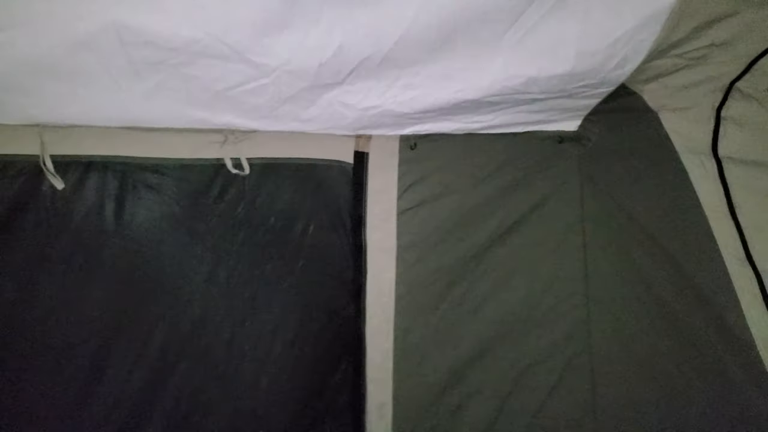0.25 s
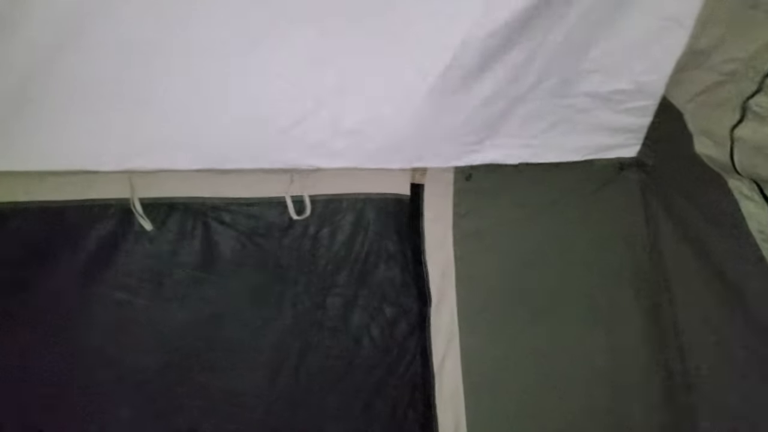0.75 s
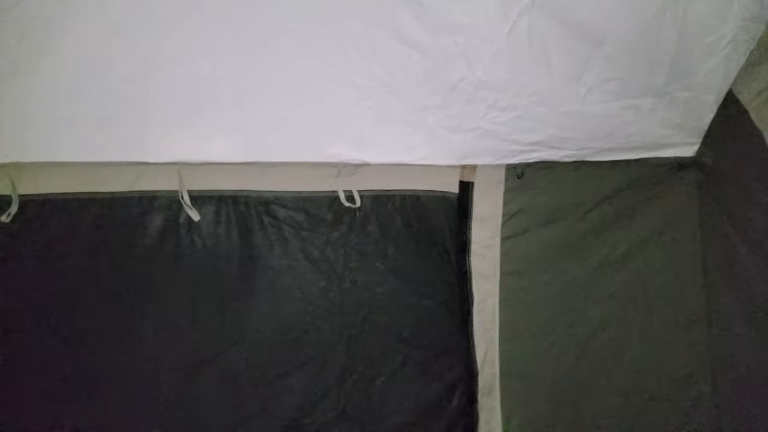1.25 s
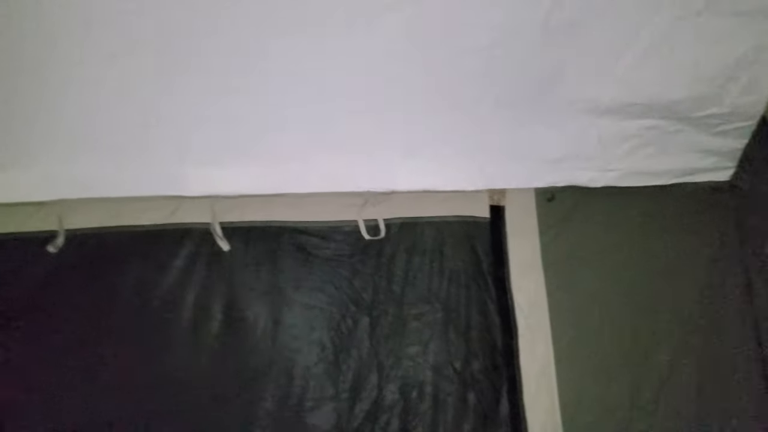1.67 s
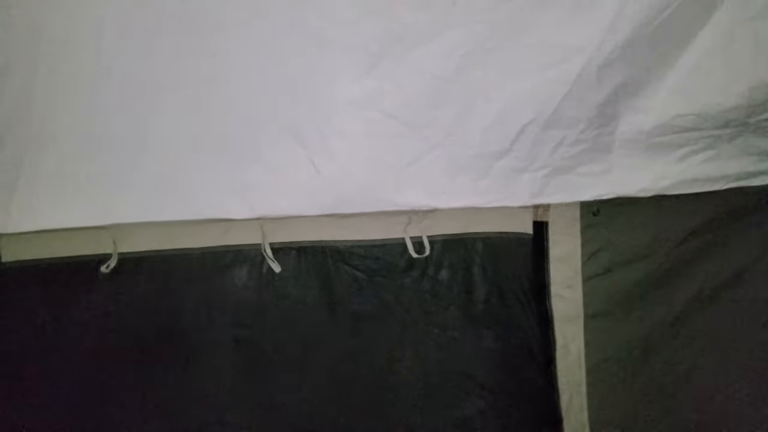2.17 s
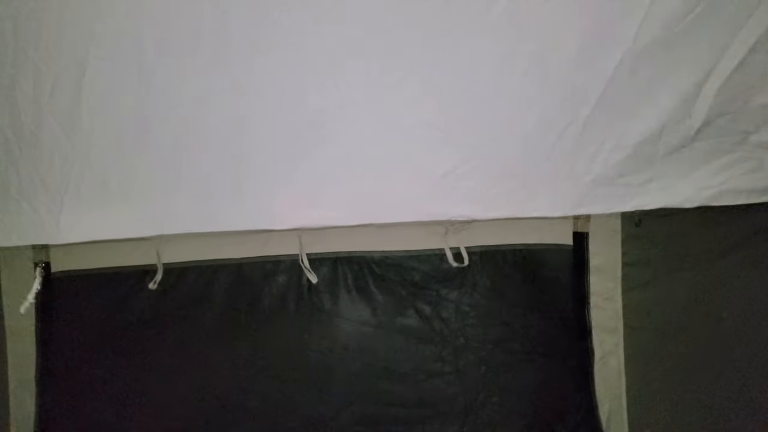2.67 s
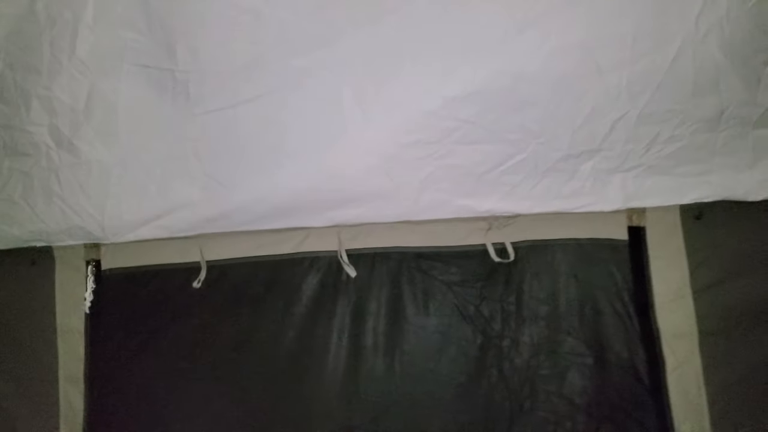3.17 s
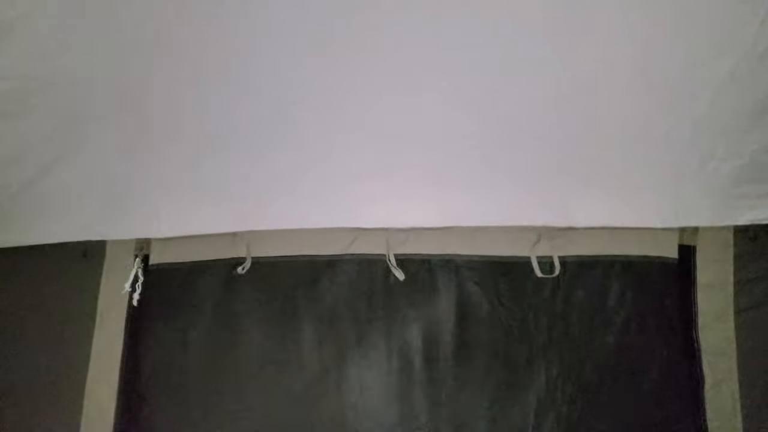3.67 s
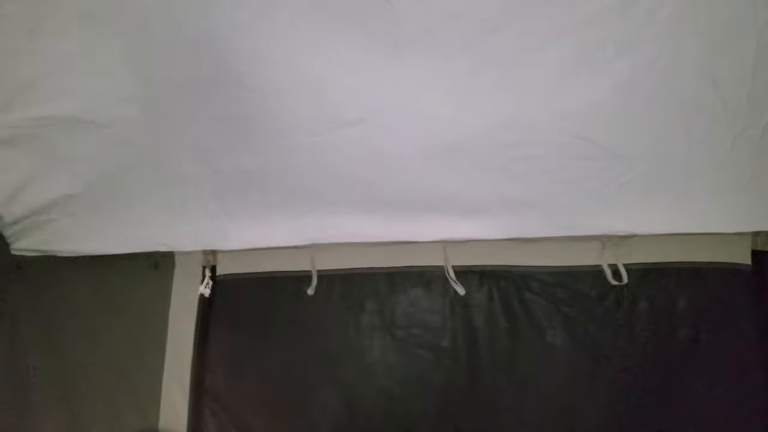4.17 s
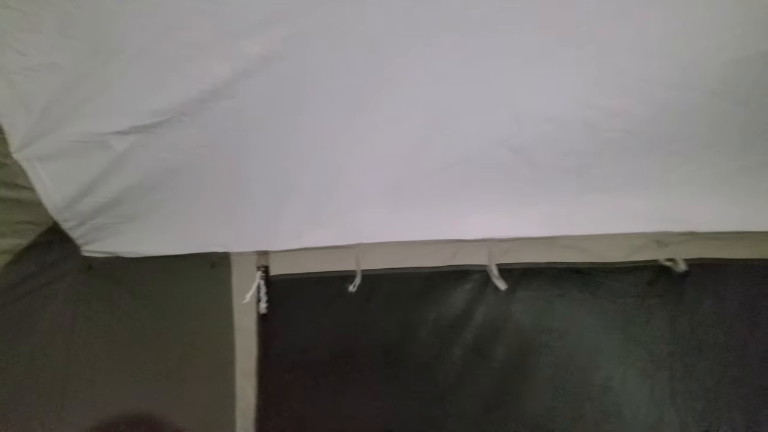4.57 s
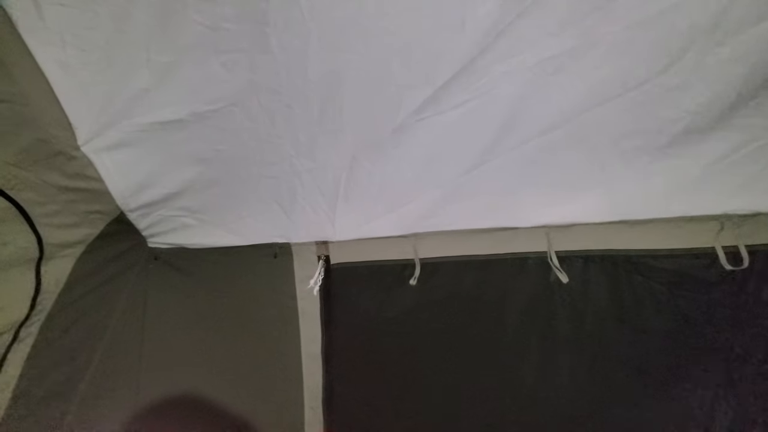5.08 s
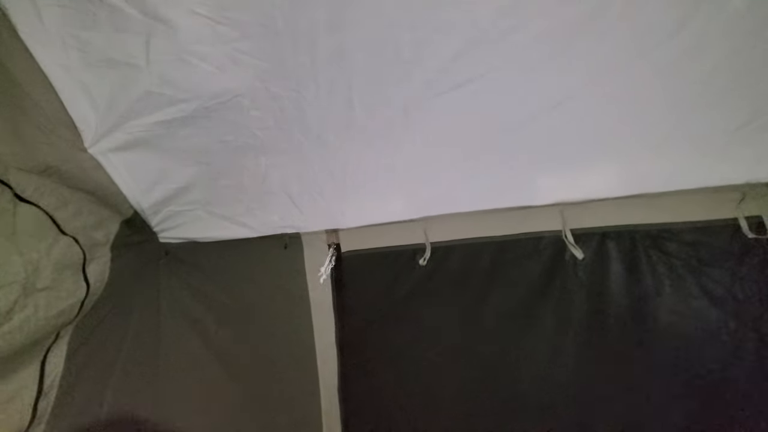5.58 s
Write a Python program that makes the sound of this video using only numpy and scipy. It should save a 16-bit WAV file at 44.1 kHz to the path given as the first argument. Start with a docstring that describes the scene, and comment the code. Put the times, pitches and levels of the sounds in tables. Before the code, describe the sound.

Close, wide stereo from a hand-held phone in a small dry tent. Muffled wind rushes steadily outside while the walls rumble and flap unevenly. Creases crack and panels thump early; something brushes and knocks the left microphone; later a strong gust yanks the cloth taut with a loud snap and a short knock of the frame. Bright, thin metal clinks scatter over everything, and the end is calmer.

```python
"""Tent walls in gusty wind, recorded inside the tent on a hand-held phone with two microphones.
The walls rumble and flutter: shaped noise that follows the wind. The cloth also rustles, swishes and scuffs.
Panels snap taut with a thump (a swung pulse) and creases crack (short ragged noise).
Zip pulls jingle as ringing modes, and jolts of the frame knock. The wind outside is an even rush.
Once something brushes over the left microphone (bursts of tiny slips) and bumps it (a swung pulse)."""
import sys
import numpy as np
from scipy import signal
from scipy.fft import rfft, irfft
from scipy.io import wavfile
from scipy.ndimage import uniform_filter1d

SR = 44100
rng = np.random.default_rng(int(sys.argv[2]) if len(sys.argv) > 2 else 0)


def dump_mix(stems):
    """Bounce the given channels to the path in sys.argv[1] as a 16-bit WAV at rate SR."""
    frames = np.atleast_2d(stems).T  # one column per channel
    limited = np.clip(frames, -1, 1)  # hard clip at full scale
    pcm = np.round(limited * 32767).astype(np.int16)
    wavfile.write(sys.argv[1], SR, pcm)


N = 257103
TIME = np.arange(N) / SR


def gain_of(db):
    """Decibels to amplitude."""
    return 10 ** (np.asarray(db) / 20)


def evened(x):
    """Scales to an rms of one."""
    return x / np.sqrt(np.mean(x ** 2) + 1e-20)


def read(points, hz):
    """Reads a spectrum on a log-frequency axis."""
    f, value = np.transpose(points)
    return np.interp(np.log(hz + 1), np.log(f + 1), value)


def curve(rows, axis=1):
    """One column of a curve at every sample."""
    rows = np.asarray(rows)
    return np.interp(TIME, rows[:, 0], rows[:, axis])


def pan(db):
    """Left and right gains of constant power for a left-minus-right level difference."""
    return evened(gain_of(np.array([[db], [-db]]) / 2))


def add(mix, s, sound):
    """Mixes a sound in at time s."""
    start = max(round(s * SR), 0)
    part = mix[:, start:][:, :sound.shape[-1]]
    part += sound[..., :part.shape[1]]


def decay(t, t60):
    """Exponential fall of 60 dB in t60 seconds."""
    return np.exp(-np.log(1000) * t / t60)


def arch(size):
    """An envelope that swells quickly and fades slightly more slowly."""
    return np.sin(np.pi * np.linspace(0, 1, size) ** 0.89)


def wander(shape, hz):
    """Smooth complex chance of rms one that changes up to about hz times a second."""
    z = rng.standard_normal(shape) + 1j * rng.standard_normal(shape)
    smoothing = 1 + (np.fft.fftfreq(shape[-1], 1 / SR) / hz) ** 2
    z = np.fft.ifft(np.fft.fft(z) / smoothing)
    return z / np.sqrt(np.mean(abs(z) ** 2))


# Left-right likeness inside the tent: f/Hz, correlation of the two microphones (-1 to 1)
LIKENESS = [(30, 1), (130, .92), (260, 0.85), (500, 0.33), (1000, -.15), (2000, 0), (5000, 0), (16000, 0)]


def colour(pair, spectrum, tilt_db=0):
    """Gives two unrelated signals a spectrum, the tent's left-right likeness and an rms of one."""
    size = pair.shape[1]
    hz = np.fft.rfftfreq(size, 1 / SR)
    same = np.clip(read(LIKENESS, hz), -1, 1)
    mid, side = rfft(pair) * np.sqrt([1 + same, 1 - same])
    tilt = tilt_db * np.log2(np.maximum(hz, 100) / 1000)  # dB per octave about 1 kHz
    shape = gain_of(read(spectrum, hz) + tilt)
    return evened(irfft(np.array([mid + side, mid - side]) * shape, size))


def grains(per_s, spread_db, t60, smooth):
    """Random little bursts of uneven size over a share of smooth noise."""
    struck = rng.random(N) < per_s / SR
    size = gain_of(spread_db * np.minimum(rng.exponential(1, N), 4)) * struck
    keep = gain_of(-120 / (t60 * SR))  # power falls by 60 dB in t60
    power = abs(signal.lfilter([1], [1, -keep], size ** 2))
    return np.sqrt(power / power.mean() + abs(smooth)) * rng.standard_normal((2, N))


# Wind outside, through the canvas: f/Hz, relative level/dB per Hz
RUSH_SPECTRUM = [(120, 5.5), (250, -0.5), (420, 6), (620, 2.5), (740, -7), (940, -16), (1200, -6.5),
                 (1650, -12), (2300, -16.5), (3300, -21), (6000, -24), (16000, -42)]


def rush(db=-56):
    """The even roar of the wind outside, dulled by the canvas."""
    return gain_of(db) * colour(rng.standard_normal((2, N)), RUSH_SPECTRUM) * pan(-0.011)


# Ringing parts of the frame, likely the poles: f/Hz, relative level/dB, t60/s
POLE_MODES = [(466, 5.5, 0.054), (736, 0.5, 0.053), (1203, -6, 0.059), (1654, -10, 0.07), (2200, -7, 0.078),
              (2690, -15, .06), (2860, -26, 0.054)]
# Jolts of the frame: t/s, level/dB
FRAME_JOLTS = [(.1435, -45), (3.4434, -29.5)]


def poles():
    """Hard snaps jolt the frame, whose decaying modes give a short, dry knock."""
    out, t = np.zeros((2, N)), TIME[:SR // 8]
    hz, mode_db, t60 = np.transpose(POLE_MODES)[:, :, None]
    modes = gain_of(mode_db) * decay(t, t60) * np.sin(2 * np.pi * hz * t)
    knock = modes.sum(0)
    for s, db in FRAME_JOLTS:
        add(out, s, gain_of(db) * pan(0) * knock)
    return out


# Cloth sliding on cloth; a narrow band is a squeak:
# t/s, length/s, centre f/Hz, half-width/octaves, level/dB (rms before the swell and fade)
CLOTH_SLIDES = [(0.139, 0.01, 2860, 0.11, -35.5), (0.428, 0.13, 1350, 0.83, -50),
                (1.037, 0.049, 5720, 0.062, -60), (2.035, .05, 390, 0.38, -44.5),
                (2.967, 0.054, 2590, 0.7, -54), (3.014, 0.063, 1900, 1.2, -51.5),
                (3.208, 0.055, 373, 0.22, -39), (3.227, 0.076, 1680, 0.87, -47.5),
                (3.335, 0.022, 2290, 0.14, -41), (3.451, 0.025, 2300, 0.12, -41.5),
                (3.919, 0.027, 600, 1.8, -49), (3.983, 0.061, 1710, 0.21, -46.5),
                (4.004, 0.1, 3470, 2.9, -47), (4.092, 0.058, 13000, 0.56, -43),
                (4.489, 0.049, 1460, 0.5, -49.5), (4.559, 0.058, 4900, 0.75, -52.5)]


def scuffs():
    """One layer drags over another: a quick swell of tiny slips that then fades."""
    out = np.zeros((2, N))
    slips = grains(per_s=450, spread_db=3, t60=.008, smooth=.5)
    for s, length, hz, octaves, db in CLOTH_SLIDES:
        size = int(length * SR)
        excerpt = slips[:, round(s * SR):][:, :size]
        offset = np.log2((np.fft.rfftfreq(size, 1 / SR) + 1) / hz) / octaves
        slide = evened(irfft(rfft(excerpt) / (1 + offset ** 2), size))
        add(out, s, gain_of(db) * slide * arch(size))
    return out * pan(-0.71)


# High swish of the weave, which the faint clinks also follow: t/s, level/dB
SWISH_LEVEL = [(0, -53.5), (.2, -49.5), (.85, -62), (1.08, -59), (1.42, -61.5), (2.4, -67.5), (2.94, -66),
               (3.13, -49), (3.53, -59.5), (3.9, -53), (4.08, -46.5), (4.18, -55), (4.78, -53),
               (5.13, -62.5), (5.83, -59.5)]
# Faint clinks: rate per second, mean level over the swish, greatest swing of level and of side (dB)
JINGLE_PER_S, JINGLE_DB, JINGLE_SPREAD_DB, JINGLE_SIDE_DB = 4.5, 1, 8.5, 7


def jingles():
    """Rows of faint clinks: the two loosest pulls swing at random, harder when the cloth swishes more."""
    count = int(JINGLE_PER_S * N / SR)
    when, strength, side, pull = rng.random((count, 4)).T
    s = (np.arange(count) + when) / JINGLE_PER_S
    swish_db = np.interp(s, *np.transpose(SWISH_LEVEL))
    db = swish_db + JINGLE_DB + JINGLE_SPREAD_DB * (2 * strength - 1)
    which = np.where(pull < .3, "rich", "light")
    return list(zip(s, db, JINGLE_SIDE_DB * (2 * side - 1), which))


# Clear clinks of the zip pulls: t/s, level/dB (before the lift all clinks share), left minus right/dB, pull
CLEAR_CLINKS = [(.012, -45, -1, "rich"), (.033, -38, 5, "rich"), (.084, -46, -2, "rich"),
                (.1715, -40.5, 2, "light"), (.242, -42, 2, "light"), (.585, -48.5, 3, "light"),
                (1.076, -52, 22, "light"), (1.215, -51, 5, "light"), (2.087, -55, -7, "pure"),
                (2.4364, -45.5, 6, "rich"), (2.454, -47, 2, "light"), (3.123, -42, 11, "light"),
                (3.149, -32.5, 2.5, "bell"), (3.225, -52, 12, "bell"), (3.931, -45, 1, "light"),
                (3.995, -43.5, -8, "light"), (4.2, -41, -2, "thin"), (4.298, -44.5, 1, "light"),
                (4.476, -47.5, 2, "rich"), (4.8474, -44, -3, "rich"), (5.033, -47, 1, "rich"),
                (5.3186, -50.5, 0, "rich")]
# Modes of the five pulls, by name: f/Hz, relative level/dB, t60/s (pitch and level vary by blow)
PULL_MODES = {"rich": [(3890, -10.5, 0.1), (5750, -16, 0.093), (6360, -6, 0.083), (7650, -34, 0.044),
              (9280, -7, 0.12), (11600, -5, 0.068), (11300, -16, 0.07), (11610, -2.5, 0.1),
              (13180, -0.5, 0.087), (15200, -0.5, 0.062)], "bell": [(4100, -7, .06), (5120, -2, 0.22),
              (5400, -2, 0.067), (9450, -15, 0.08), (12080, 7.5, 0.074), (12310, -1, .08),
              (13400, -11, 0.059), (14230, 0, 0.11)], "pure": [(11350, 4, 0.14), (11650, -14, .08)],
              "light": [(7760, -10, 0.1), (11600, -10, 0.052), (12160, 5.5, 0.083), (12800, -16, 0.085),
              (13000, -19, .05), (14400, 4.5, 0.047)], "thin": [(11600, -11, 0.079), (11770, -1, 0.14)]}


def zips(uneven_db=3, detune=0.002, blur_hz=45, pure=0.8, tick_db=-3.5, tick_t60=0.085, rise=0.003, lift_db=3.5):
    """Small metal pulls chatter as they strike, which blurs their modes; each blow favours other modes."""
    out, t = np.zeros((2, N)), TIME[:SR // 5]
    for s, db, side_db, which in list(CLEAR_CLINKS) + jingles():
        hz, mode_db, t60 = np.transpose(PULL_MODES[which])[:, :, None]
        hz = hz * (1 + detune * rng.standard_normal(hz.shape))
        size = gain_of(mode_db + uneven_db * rng.standard_normal(hz.shape))
        steady = pure * np.exp(2j * np.pi * rng.random((2, len(hz), 1)))
        blur = wander((2, len(hz), len(t)), blur_hz)
        chatter = evened(((steady + blur) * np.exp(2j * np.pi * hz * t)).real)
        ring = (size * decay(t, t60) * chatter).sum(1) / np.linalg.norm(size)
        tick = colour(rng.standard_normal((2, len(t))), SWISH_SPECTRUM) * decay(t, tick_t60)
        clink = (ring + gain_of(tick_db) * tick) * (1 - np.exp(-t / rise))
        add(out, s, gain_of(db + lift_db) * pan(side_db) * clink)
    return out


# Something dragging on the left microphone: f/Hz, relative level/dB per Hz (before each rub's tilt)
BRUSH_SPECTRUM = [(150, 4), (500, 7.5), (1400, 6.5), (3000, 1.5), (4500, -6), (6300, 1), (8000, -5.5),
                  (11000, -11.5), (16000, -17)]
# Its rubs: t/s, length/s, level/dB (rms before the envelope), brightness/dB per octave
MICROPHONE_RUBS = [(1.43, 0.38, -50, 2), (1.611, 0.13, -41, 0), (1.681, 0.011, -30.5, -2.5),
                   (1.691, 0.019, -29.5, -10), (1.737, 0.15, -44, 18)]


def brush():
    """Something drags right over the left port, catches, and thins to a fine hiss as it lets go."""
    out = np.zeros((2, N))
    slips = grains(per_s=900, spread_db=2.5, t60=.008, smooth=1.5)
    for s, length, db, tilt_db in MICROPHONE_RUBS:
        size = int(length * SR)
        excerpt = slips[:, round(s * SR):][:, :size]
        rub = colour(excerpt, BRUSH_SPECTRUM, tilt_db)
        add(out, s, gain_of(db) * rub * np.sin(np.linspace(0, np.pi, size)))
    return out * gain_of([[0], [-30]])  # left, right


# Creases at the walls: f/Hz, relative level/dB per Hz (before each crack's tilt)
CRACK_SPECTRUM = [(120, -18), (300, 9), (450, 5.5), (640, 0.5), (900, -1), (1250, 2), (1600, 0.5),
                  (2000, -1), (2400, -6), (2900, -7), (3700, -15), (6000, -21.5), (10000, -35.5),
                  (16000, -26.5)]
# Creases cracking: t/s, level/dB (before the envelope), rise/s, decay t60/s, brightness/dB per octave
CREASE_CRACKS = [(0.1427, -23.5, 0.00061, 0.032, -1.5), (0.1504, -29.5, 0.00039, 0.11, 1),
                 (.294, -38.5, .003, 0.039, 3), (.354, -34, 0.0017, 0.051, 9.5),
                 (.497, -36.5, 0.0035, 0.13, -2), (1.981, -40.5, 0.00044, 0.097, 1),
                 (3.202, -38.5, 0.0024, 0.12, 1.5), (3.221, -30, 0.0026, 0.11, 7),
                 (3.278, -34, .003, 0.089, 1.5), (3.289, -36.5, 0.00085, 0.11, 4),
                 (3.4432, -21, 0.0011, 0.033, 0.4), (3.451, -33.5, 0.0013, 0.092, 5.5),
                 (4.023, -35, .002, 0.044, 0.5), (4.047, -36, .002, 0.074, 1.5),
                 (4.080, -35.5, 0.0023, 0.14, 1.5), (4.094, -29, 0.0023, 0.061, -2),
                 (4.571, -39.5, 0.0007, 0.11, -4.5), (4.988, -50, 0.00057, 0.057, 0.5),
                 (5.598, -43, 0.0017, 0.077, 9.5), (5.774, -42.5, 0.0006, 0.25, -3)]


def cracks(edge=0.93, edge_t60=0.0066, ragged_db=4):
    """Creases pull straight: a sharp edge, then a short ragged scatter between the walls."""
    out, t = np.zeros((2, N)), TIME[:SR // 5]
    for s, db, rise, t60, tilt_db in CREASE_CRACKS:
        fall = decay(t, t60) + edge * decay(t, edge_t60)
        ragged = gain_of(ragged_db * wander(t.shape, hz=496).real)
        crackle = rng.standard_normal((2, len(t))) * ragged
        add(out, s, gain_of(db) * colour(crackle, CRACK_SPECTRUM, tilt_db) * fall * (1 - np.exp(-t / rise)))
    return out * pan(-.7)


# Panels pulled taut, and at 1.7142 s a bump on the left microphone: t/s, peak level/dB (of the swing,
# before panning), time scale of the jerk/s, swing f/Hz, left minus right/dB
THUMP_EVENTS = [(.109, -31.5, 0.00033, 220, -1), (0.146, -27.5, 0.001, 65, 1),
                (0.171, -26.5, 0.0014, 85.5, 1), (.291, -31, 0.0006, 110, 2),
                (0.481, -27.5, 0.0011, 81.5, 2), (0.9798, -28.5, 0.00063, 60, 2.5),
                (1.105, -34.5, 0.00036, 60, 1), (1.516, -31, 0.00067, 189, 2),
                (1.7142, -14, 0.00068, 49, 34), (2.041, -25, 0.0036, 80, 0), (2.0543, -30, 0.00087, 89, -1),
                (2.116, -33, 0.00094, 130, 0), (2.577, -33.5, 0.00095, 213, 2),
                (3.227, -25.5, 0.00039, 109, 3), (3.4436, -14.5, 0.0015, 59.3, 1),
                (4.093, -23, 0.00096, 61.7, 0.5), (4.2079, -26.5, 0.0023, 109, 1.5),
                (4.2167, -28.5, 0.0022, 127, 1)]


def thumps(damping=0.61, whip_s=0.00027, whip_db=-2):
    """A panel stops dead or the left microphone is bumped: a pulse swings; hard ones add a whip of pressure."""
    lead = .003  # seconds of room for the whip before the pulse
    out, t = np.zeros((2, N)), TIME[:SR // 8] - lead
    for s, db, jerk, hz, side_db in THUMP_EVENTS:
        u = np.maximum(t, 0) / jerk
        suction = -u ** 2 * np.exp(-u)
        w = 2 * np.pi * hz
        resonance = signal.bilinear([1, 0, 0], [1, damping * w, w * w], SR)
        swing = signal.lfilter(*resonance, suction)
        hardness = np.clip((db + 20) / 8, 0, 1)  # none at or below -20 dB
        whip = hardness * gain_of(whip_db) * np.exp(-abs(t) / whip_s)
        add(out, s - lead, gain_of(db) * pan(side_db) * (swing / abs(swing).max() + whip))
    return out


# Short gusts on top of the wind: t/s, length/s, lift of the rumble/dB,
# lift of the cloth's motion/dB (the flutter takes only a share)
SHORT_GUSTS = [(0.196, 0.14, -2.5, 7), (.32, 0.057, 4, 3.5), (0.63, .08, 3.5, -1), (2.047, 0.12, 7.5, 0.5),
               (3.028, 0.075, 0, 9), (3.26, 0.13, 8, 9.5), (3.418, 0.051, 11.5, 6),
               (3.712, 0.074, 4.5, 2.5), (3.913, 0.091, 4, 0.5), (4.095, 0.066, 6, 17), (5.273, 0.22, 5, 2),
               (5.524, 0.11, 2, -3.5)]


def gust_lift(axis):
    """Decibels that the gusts add: each is a bell in time."""
    return sum(row[axis] * np.exp(-(2 * (TIME - row[0]) / row[1]) ** 2) for row in SHORT_GUSTS)


# Cloth in the tent, three layers: f/Hz, relative level/dB per Hz
FLUTTER_SPECTRUM = [(70, -27), (140, 1), (220, 2.5), (310, -2), (430, -3.5), (620, -12.5), (760, -8.5),
                    (950, -18), (1250, -15.5), (2200, -40), (5000, -73)]
RUSTLE_SPECTRUM = [(250, -17), (600, 7.5), (950, 0.5), (1300, -1.5), (1700, 3), (2600, -5.5), (3500, -12),
                   (6000, -20), (9000, -30), (16000, -26)]
SWISH_SPECTRUM = [(1200, -2), (3500, -1), (6000, -0.5), (8200, 2), (9000, -3.5), (10500, -0.5),
                  (12200, 7.5), (13400, 1), (16000, 2.5)]
# levels in a moderate blow (dB), and how each follows the wind (dB per dB)
FLUTTER_DB, RUSTLE_DB = -52, -60.5
FLUTTER_FOLLOWS, RUSTLE_FOLLOWS = 0.84, 0.73


def cloth(flutter_lift=0.53):
    """Slack cloth flutters in small flaps, its folds rustle, and the weave swishes over itself."""
    wind, lift = curve(WIND_STRENGTH), gust_lift(axis=3)
    flaps = grains(per_s=110, spread_db=2.5, t60=.06, smooth=1.2)
    folds = grains(per_s=200, spread_db=2.5, t60=0.13, smooth=0.49)
    weave = grains(per_s=83, spread_db=6.5, t60=0.27, smooth=0.96)
    flutter_db = FLUTTER_DB + FLUTTER_FOLLOWS * wind + flutter_lift * lift
    rustle_db = RUSTLE_DB + RUSTLE_FOLLOWS * wind + lift
    flutter = colour(flaps, FLUTTER_SPECTRUM) * gain_of(flutter_db)
    rustle = colour(folds, RUSTLE_SPECTRUM) * gain_of(rustle_db)
    swish = colour(weave, SWISH_SPECTRUM) * gain_of(curve(SWISH_LEVEL))
    return flutter * pan(0) + rustle * pan(-4.5) + swish * pan(1.5)


# Big panels around the microphones: f/Hz, relative level/dB per Hz
RUMBLE_SPECTRUM = [(15, -28.5), (30, -4.5), (50, -2.5), (70, -1.5), (100, -5.5), (130, -12.5), (170, -18.5),
                   (300, -36.5), (600, -73)]
# Strength of the wind on the tent: t/s, level/dB above a moderate blow
WIND_STRENGTH = [(0, 6), (.5, 5), (.85, -1.5), (1.08, 1.5), (1.4, -2), (1.65, 1.5), (1.85, -4), (2.05, 0.5),
                 (2.35, -1), (2.93, -2), (3.25, 3.5), (3.55, -2), (3.82, 0.5), (4.03, 4.5), (4.36, 0.5),
                 (4.72, 4.5), (5.13, -5.5), (5.83, -1.5)]
RUMBLE_DB = -44.5  # in a moderate blow


def walls():
    """The wind shakes the big panels: a low rumble that rises and falls with wind and gusts."""
    air = colour(rng.standard_normal((2, N)), RUMBLE_SPECTRUM)
    swell = np.sqrt(uniform_filter1d((air ** 2).mean(0), size=4000))  # running level over about 91 ms
    rumble_db = RUMBLE_DB + curve(WIND_STRENGTH) + gust_lift(axis=2)
    return air / swell * gain_of(rumble_db) * pan(.3)


def scene():
    """Everything heard inside the tent."""
    background = rush() + poles() + scuffs() + zips() + brush()
    return background + cracks() + thumps() + cloth() + walls()


def record(dry):
    """The phone's band limit: a steep low-pass at 15950 Hz."""
    low_pass = signal.firwin(511, 15950, window=("kaiser", 9), fs=SR)
    return signal.oaconvolve(dry, low_pass[None], "same", axes=1)


dry = scene()
out = record(dry)
dump_mix(out)
```